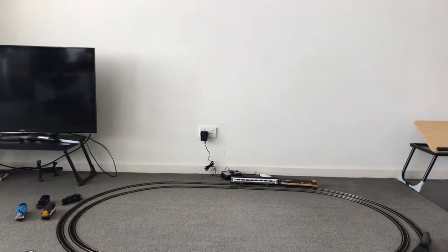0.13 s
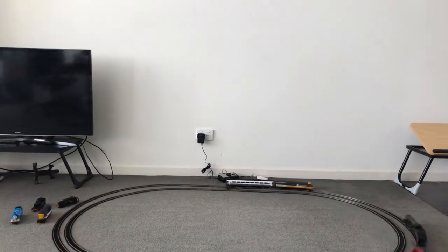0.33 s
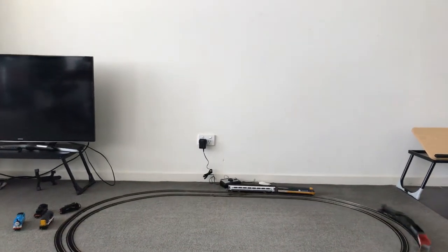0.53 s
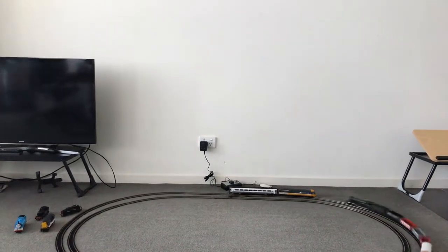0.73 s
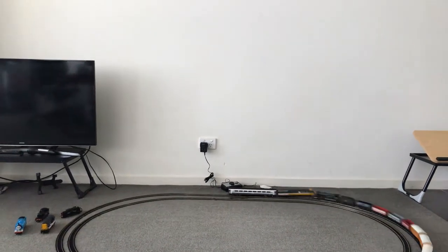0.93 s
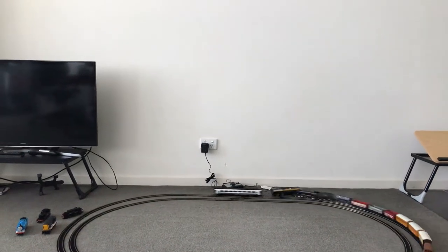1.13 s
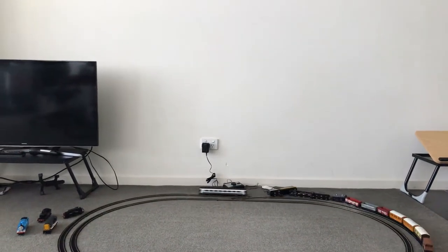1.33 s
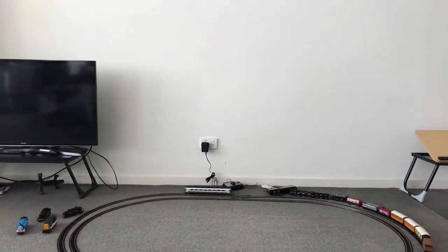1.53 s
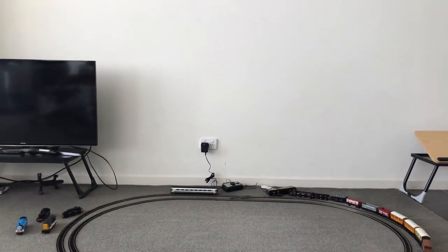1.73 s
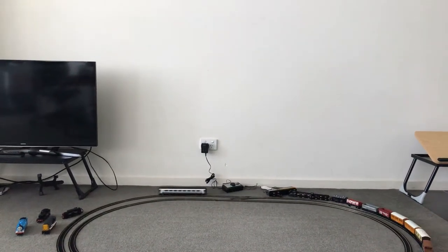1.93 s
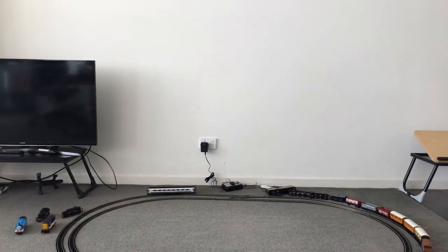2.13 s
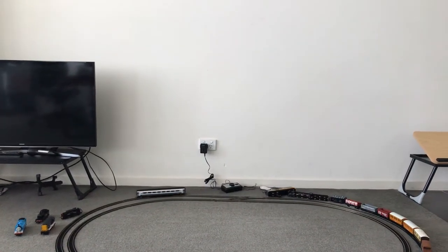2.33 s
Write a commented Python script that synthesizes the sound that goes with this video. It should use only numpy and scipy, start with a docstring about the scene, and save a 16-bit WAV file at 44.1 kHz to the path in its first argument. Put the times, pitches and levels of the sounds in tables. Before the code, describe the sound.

A model train whirs along its track, gears buzzing and wheels ticking densely. At about 0.9 seconds it hits standing carriages with a loud plastic crack, followed by clattering shells and clinking metal wheels until it halts around 1.4 seconds. One carriage then rolls faintly on, with light settling clicks near 1.6 and 2.2 seconds. A small bare room adds short echoes over faint rumble and hiss.

```python
"""A model train whirs round its track on a carpet: gears buzz, wheels tick along the rails.
At 0.93 s it runs into standing carriages. Plastic shells crack and ring, metal wheels clink and
rattle, the train drags to a halt, parts settle and one carriage coasts on.
A small bare room smears every click; a low rumble and faint hiss remain."""
import sys
import numpy as np
from scipy import signal
from scipy.fft import rfft, irfft
from scipy.io import wavfile

SR = 44100
rng = np.random.default_rng(int(sys.argv[2]) if len(sys.argv) > 2 else 0)


def dump_mix(stems):
    """Bounce the given channels to the path in sys.argv[1] as a 16-bit WAV at rate SR."""
    frames = np.atleast_2d(stems).T  # one column per channel
    limited = np.clip(frames, -1, 1)  # hard clip at full scale
    pcm = np.round(limited * 32767).astype(np.int16)
    wavfile.write(sys.argv[1], SR, pcm)


N = 105840

# Room rumble and hiss. Each row: frequency in Hz, relative density in dB.
RUMBLE_SPECTRUM = [(20, -7), (40, -45), (62, -5.5), (90, 1.5), (125, -3.5), (200, -3.5), (300, -7),
                   (430, -20.5), (1000, -34.5)]
HISS_SPECTRUM = [(200, -26), (400, -3), (1000, -7), (1600, -10.5), (2600, -20.5), (4000, -21), (5000, -23),
                 (6200, -18), (7300, -8.5), (9000, -5.5), (10000, -11.5), (12500, -15.5), (15500, -24)]
# Fading hiss. Each row: time in seconds, level in dB.
HISS_ENVELOPE = [(0, -49.5), (1.7, -62.5), (2.25, -64), (2.4, -68.5)]
# Plastic shell resonances. Each row: frequency in Hz, relative level in dB, T60 in seconds.
SHELL_RESONANCES = [(320, -11, .08), (569, -6, .1), (644, -6, .08), (716, -8, .07), (855, -5, .14),
                    (991, 2, .3), (1065, -4, .14), (1145, -7, .1), (1510, -7, .08), (1550, -7, .13),
                    (1703, -7, .08), (2430, -7, .05), (2689, -6, .14), (3330, -6, .07)]
# Struck plastic; struck wheels, couplings and rails. Each row: frequency in Hz, relative density in dB.
CRACK_SPECTRUM = [(30, -26), (100, -1), (170, -0.5), (330, 2.5), (430, -8), (560, 2), (1000, 4.5),
                  (2000, 1.5), (2700, 4.5), (4000, 2.5), (6000, 1), (15000, -44)]
METAL_SPECTRUM = [(300, -19), (2000, -25), (3400, -15), (5000, -12.5), (6000, -11.5), (6900, -1),
                  (8000, 1.5), (9400, 1.5), (10000, -5.5), (12500, -7.5), (15500, -29)]
# Carriage knocked free. Each row: time in seconds, level in dB.
COAST_ENVELOPE = [(1.35, -92), (1.48, -62.5), (1.65, -67.5), (1.8, -71), (2.0, -70), (2.14, -69.5),
                  (2.25, -70.5), (2.33, -77), (2.4, -80)]
# Bright cracks of the first impact, then light clicks as parts settle.
# Each row: start in seconds, level in dB, decay in seconds.
SNAP_EVENTS = [(0.933, -28, 0.0046), (0.9362, -22, 0.0065), (1.3274, -36.5, 0.0019), (1.3361, -28, 0.0021),
               (1.568, -54.5, 0.018), (1.651, -57.5, 0.011), (2.233, -55.5, 0.0082), (2.27, -54, .008)]
# Bright cracks and clicks; wheels on rails. Each row: frequency in Hz, relative density in dB.
SNAP_SPECTRUM = [(200, -11), (1000, 1), (2000, 2), (3400, -13.5), (5000, 0), (8000, -5.5), (9300, 15),
                 (10400, -2), (14000, 4), (15500, -1)]
WHEEL_SPECTRUM = [(40, -19), (90, -20), (180, -3), (260, -6), (330, 2.5), (440, -15.5), (560, 0.5),
                  (900, -5), (1250, -2), (1900, -2.5), (2250, 0.5), (2900, 0), (3800, -4), (5600, -4),
                  (7000, 2), (8200, 6), (9300, 3.5), (10400, -2), (12500, -1), (15500, -4.5)]
# Rolling wheels; gear whir, swelling round the bend. Each row: time in seconds, level in dB.
WHEEL_ENVELOPE = [(0, -35), (.25, -37.5), (.6, -38), (.93, -39.5), (1.15, -37), (1.28, -39), (1.36, -66.5),
                  (1.41, -68), (1.45, -100)]
WHIR_ENVELOPE = [(0, -56.5), (.3, -53.5), (.58, -52.5), (.8, -54), (.93, -61), (1.3, -70), (1.42, -94)]
# Derailed wheels on sleepers. Each row: time in seconds, plastic level in dB, metal level in dB.
RATTLE_ENVELOPES = [(.925, -89, -79), (.94, -39.5, -35), (1.03, -40, -34.5), (1.12, -45.5, -42.5),
                    (1.18, -52, -47), (1.24, -43.5, -53), (1.32, -57.5, -42.5), (1.41, -55, -52),
                    (1.45, -61, -49.5), (1.55, -100, -100)]
# Collisions. Each row: start in seconds, knock in dB, clink in dB, knock pitch in Hz, decay in seconds.
BLOW_EVENTS = [(0.9271, -27.5, -23.5, 1140, 0.0066), (0.9375, -28.5, -21.5, 1450, 0.01),
               (0.947, -32, -48, 1220, 0.0027), (.980, -60, -29, 1120, 0.0045),
               (1.011, -27.5, -41, 720, 0.0031), (1.025, -34, -25.5, 1080, 0.0054),
               (1.037, -29, -46, 1010, 0.004), (1.055, -45, -42, 980, 0.0017),
               (1.078, -28, -51, 674, 0.0039), (1.082, -29.5, -45, 1040, 0.0059),
               (1.098, -64, -40, 1110, 0.0045), (1.119, -39.5, -38, 1040, 0.0096),
               (1.144, -40, -38, 1210, 0.0058), (1.1965, -42, -29.5, 1150, 0.003),
               (1.204, -50, -31, 1080, 0.011), (1.2199, -31.5, -25.5, 1820, 0.0026),
               (1.23, -33.5, -27.5, 1810, 0.0021), (1.246, -32, -36, 1610, 0.0023),
               (1.269, -36.5, -38, 1510, 0.011), (1.297, -61, -30.5, 990, 0.0023),
               (1.315, -34, -48, 900, 0.0039), (1.3236, -74, -29, 920, .003),
               (1.3312, -58, -22.5, 970, 0.0013), (1.3967, -41, -37.5, 3320, 0.012),
               (1.428, -59, -48, 3320, 0.0074), (1.579, -54, -52, 2710, 0.025),
               (1.657, -65, -55, 2600, 0.011)]
# Dulled treble at the start. Each row: frequency in Hz, gain in dB.
VEIL_RESPONSE = [(100, 1), (5000, -4), (5800, 1.5), (6000, -6.5), (6300, -11), (8200, -17.5), (9400, -15.5),
                 (10300, -11), (12000, -9.5), (15500, -12)]


def amp(db):
    """Decibels to gain."""
    return 10 ** (np.asarray(db) / 20)


def unit(x):
    """Scale to rms 1."""
    return x / np.sqrt(np.mean(x ** 2) + 1e-20)


def envelope(rows, column=1):
    """Gain over time from one dB column."""
    rows = np.array(rows)
    return amp(np.interp(np.arange(N) / SR, rows[:, 0], rows[:, column]))


def response(spectrum):
    """Minimum-phase impulse response of a spectrum."""
    hz, db = np.array(spectrum).T
    bins_hz = np.maximum(np.fft.rfftfreq(4096, 1 / SR), 1)
    cepstrum = irfft(np.log(amp(np.interp(np.log(bins_hz), np.log(hz), db))))
    half = len(cepstrum) // 2
    cepstrum[1:half] *= 2
    cepstrum[half + 1:] = 0
    return irfft(np.exp(rfft(cepstrum)))


def ring(x, ir):
    """Convolve with a response scaled to unit energy."""
    return signal.fftconvolve(x, ir / np.linalg.norm(ir))[:len(x)]


def butter(x, hz, kind="low", order=2):
    """Butterworth filter."""
    return signal.sosfilt(signal.butter(order, hz, kind, fs=SR, output="sos"), x)


def wander(knots_per_s):
    """Slow random drift, rms 1."""
    knots = rng.standard_normal(1024)
    return unit(np.interp(np.arange(N) / SR * knots_per_s, np.arange(len(knots)), knots))


def ticks(per_s, spread_db=3):
    """Tiny random impacts of uneven size, rms 1."""
    sizes = amp(spread_db * np.clip(rng.standard_normal(N), -2, 2))
    signs = np.sign(rng.standard_normal(N))
    return unit(sizes * signs * (rng.random(N) < per_s / SR))


def contact(start_s, decay_s, rise_s=0.0013):
    """Two parts meet and chatter: fast rise, exponential decay."""
    age_s = np.maximum(np.arange(N) / SR - start_s, 0)
    rise = np.minimum(age_s / rise_s, 1)
    decay = np.exp(-np.maximum(age_s - rise_s, 0) / decay_s)
    return rise * decay * np.sign(rng.standard_normal(N))


def background(rumble_db=-61.5, waver_db=0.39):
    """Low room rumble and faint, wavering hiss."""
    rumble = amp(rumble_db) * ring(rng.standard_normal(N), response(RUMBLE_SPECTRUM))
    hiss = ring(rng.standard_normal(N), response(HISS_SPECTRUM)) * amp(waver_db * wander(7.7))
    return rumble + hiss * envelope(HISS_ENVELOPE)


def reflections(low_t60_s=0.48, treble_t60_s=0.39, gap_s=0.0024):
    """Dense echoes off bare walls from one spot; treble dies sooner."""
    t = np.arange(SR // 2) / SR
    echoes = rng.standard_normal(len(t)) * (t > gap_s)
    low = butter(echoes, hz=3930)
    return low * amp(-60 * t / low_t60_s) + (echoes - low) * amp(-60 * t / treble_t60_s)


def room(x, spots=8, shifts_per_s=23, wet_to_dry_db=-1):
    """Sound shifts between spots along the train, each with its own echoes."""
    shares = np.array([wander(shifts_per_s) for _ in range(spots)])
    shares /= np.linalg.norm(shares, axis=0)
    wet = sum(ring(x * share, reflections()) for share in shares)
    return (x + amp(wet_to_dry_db) * wet) / np.hypot(1, amp(wet_to_dry_db))


def shell(force, modes_db=-10):
    """A plastic carriage body cracks and rings in its modes."""
    t = np.arange(SR // 2) / SR
    modes = sum(amp(db) / np.sqrt(t60_s) * np.sin(2 * np.pi * hz * t) * amp(-60 * t / t60_s)
                for hz, db, t60_s in SHELL_RESONANCES)
    return ring(force, response(CRACK_SPECTRUM)) + amp(modes_db) * ring(force, modes)


def coasting():
    """A loose carriage rolls away, its wheels ticking softly into the shell."""
    soft_ticks = butter(ticks(per_s=730), hz=2970)
    return unit(shell(soft_ticks)) * envelope(COAST_ENVELOPE)


def snaps():
    """Bright cracks of the first impact, then light clicks as parts settle."""
    force = sum(amp(db) * contact(start_s, decay_s) for start_s, db, decay_s in SNAP_EVENTS)
    return ring(force, response(SNAP_SPECTRUM))


def gear_whir(motor_hz=140.5, drift=0.03, spread_db=1.6, housing_hz=(2020, 3080)):
    """Gears buzz in their housing, one uneven pulse per motor turn."""
    turns = np.cumsum(motor_hz * (1 + drift * wander(7.5))) / SR
    pulses = np.diff(np.floor(turns), prepend=0) * amp(spread_db * rng.standard_normal(N))
    return unit(butter(pulses, housing_hz, "band")) * envelope(WHIR_ENVELOPE)


def rolling(flutter_db=0.64):
    """Wheels tick densely along the rails."""
    wheels = ring(ticks(per_s=5000, spread_db=3.5), response(WHEEL_SPECTRUM))
    return wheels * amp(flutter_db * wander(28.56)) * envelope(WHEEL_ENVELOPE)


def knock(force, pitch_hz, width_oct=1.39):
    """Contact stiffness favours a broad band round one pitch."""
    edges_hz = pitch_hz * 2 ** (np.array([-.5, .5]) * width_oct)
    band = butter(force, edges_hz, "band", order=1)
    return .5 * band * np.linalg.norm(force) / np.linalg.norm(band)


def crash(rattle_per_s=1200):
    """Blows and derailed rattle drive the plastic shells and metal parts."""
    plastic = ticks(rattle_per_s) * envelope(RATTLE_ENVELOPES, column=1)
    metal = ticks(rattle_per_s) * envelope(RATTLE_ENVELOPES, column=2)
    for start_s, knock_db, clink_db, pitch_hz, decay_s in BLOW_EVENTS:
        force = contact(start_s, decay_s)
        plastic += amp(knock_db) * knock(force, pitch_hz)
        metal += amp(clink_db) * force
    return shell(plastic) + ring(metal, response(METAL_SPECTRUM))


def scene():
    """Train and crash in the room, the same in both ears."""
    train = rolling() + gear_whir() + crash() + snaps() + coasting()
    mono = room(train) + background()
    return np.array([mono, mono])


def record(dry):
    """The treble starts veiled, then opens; the very top is cut."""
    open_s, fade_s, top_hz = 0.218, 0.016, 15700
    clear = np.clip((np.arange(N) / SR - open_s) / fade_s + .5, 0, 1)
    veiled = signal.fftconvolve(dry, response(VEIL_RESPONSE)[None], axes=1)[:, :N]
    top_cut = signal.ellip(12, .1, 80, top_hz, fs=SR, output="sos")
    return signal.sosfilt(top_cut, clear * dry + (1 - clear) * veiled)


dry = scene()
out = record(dry)
dump_mix(out)
```